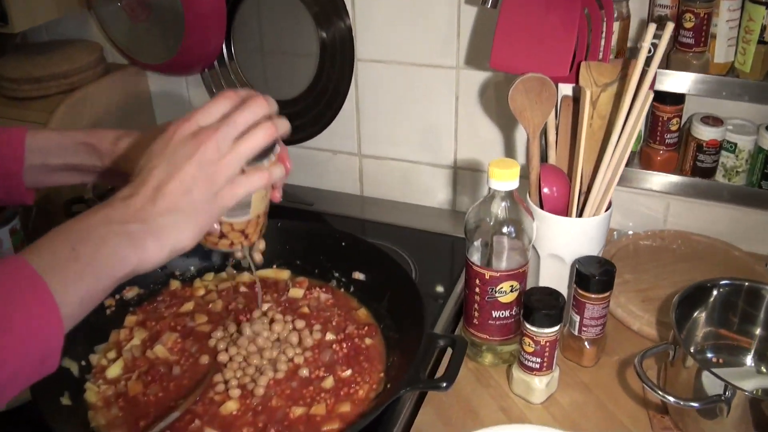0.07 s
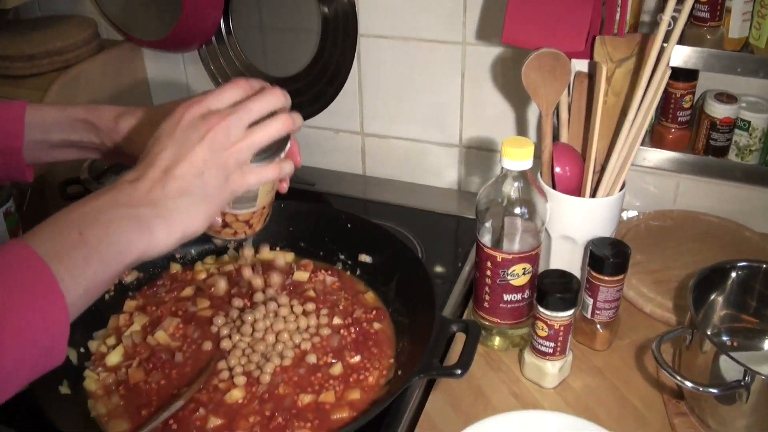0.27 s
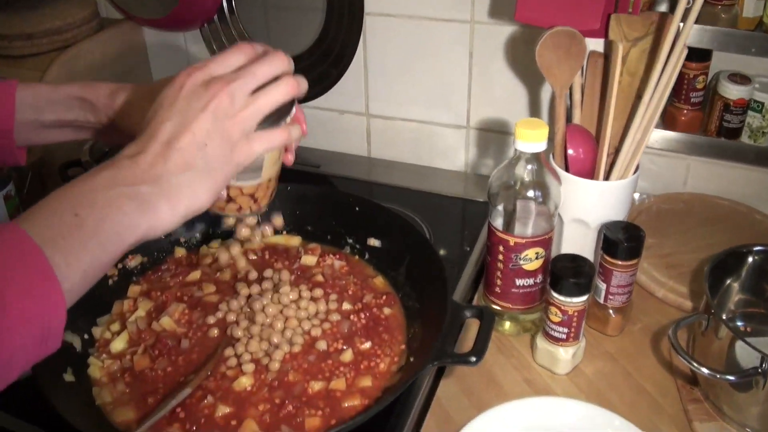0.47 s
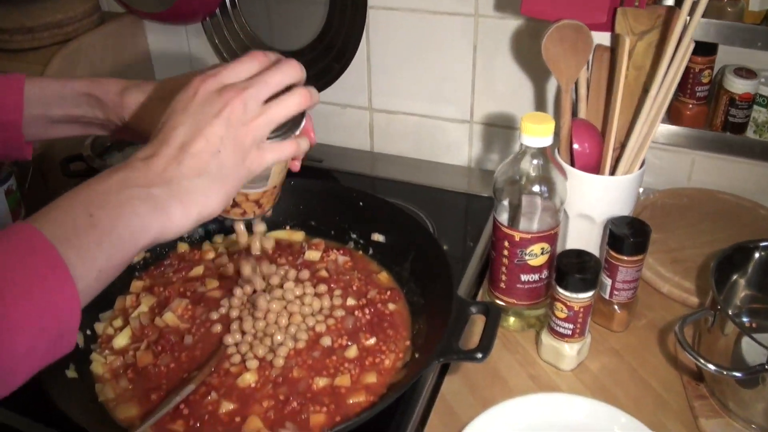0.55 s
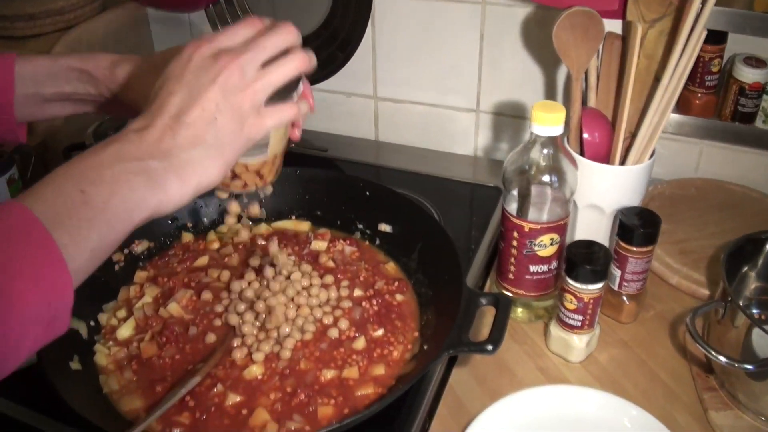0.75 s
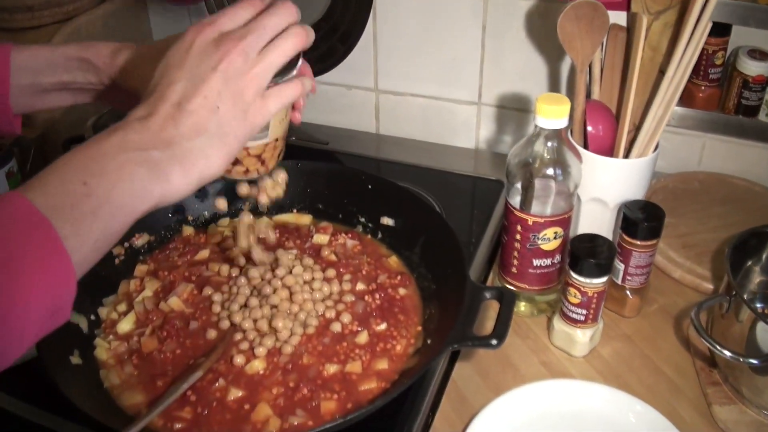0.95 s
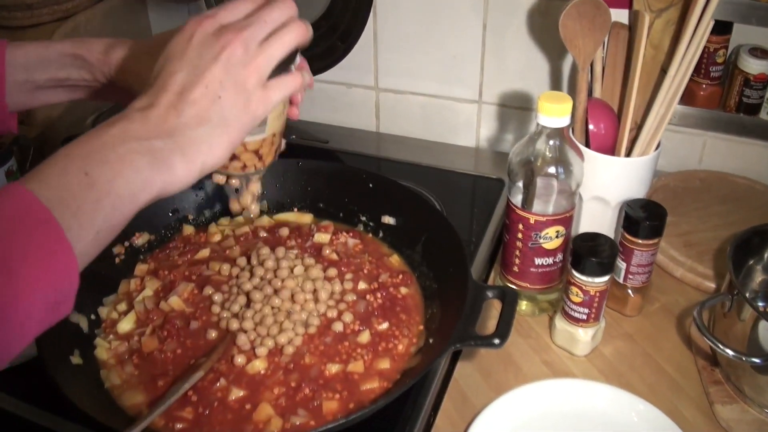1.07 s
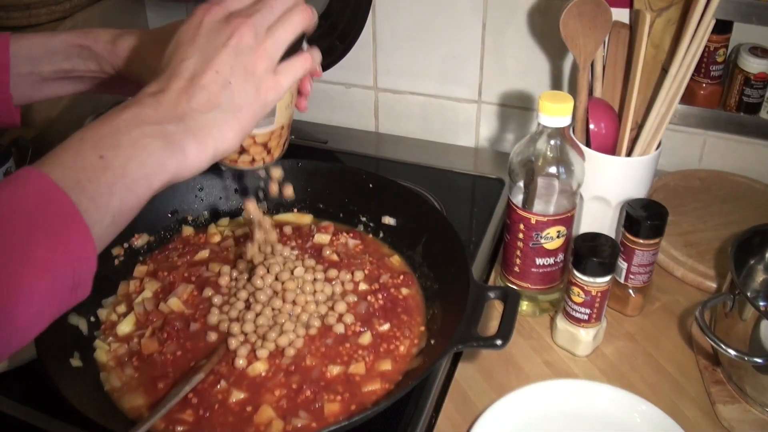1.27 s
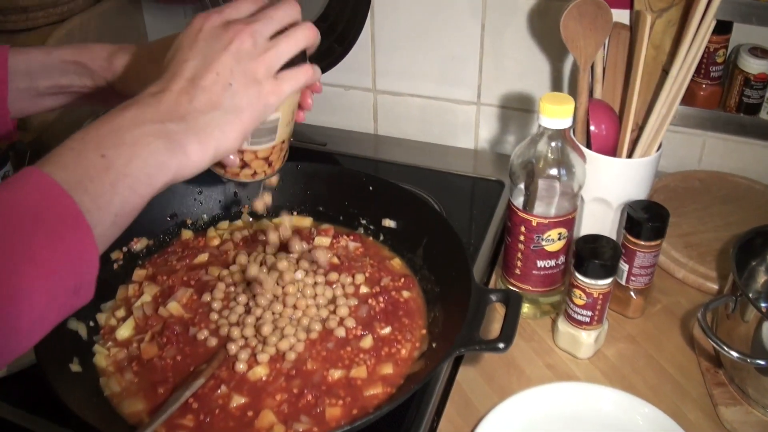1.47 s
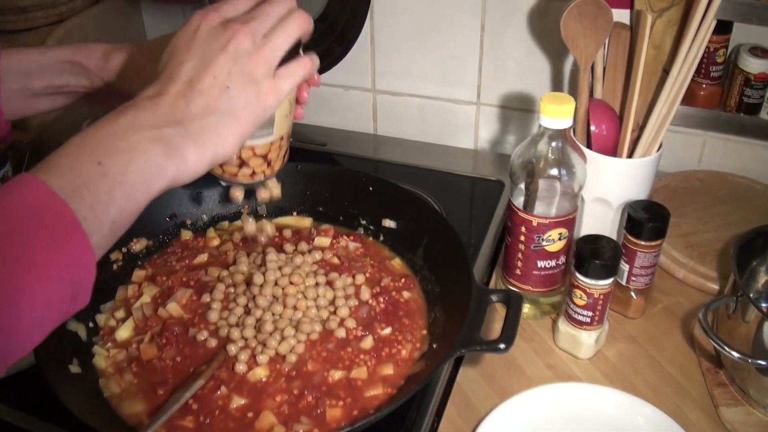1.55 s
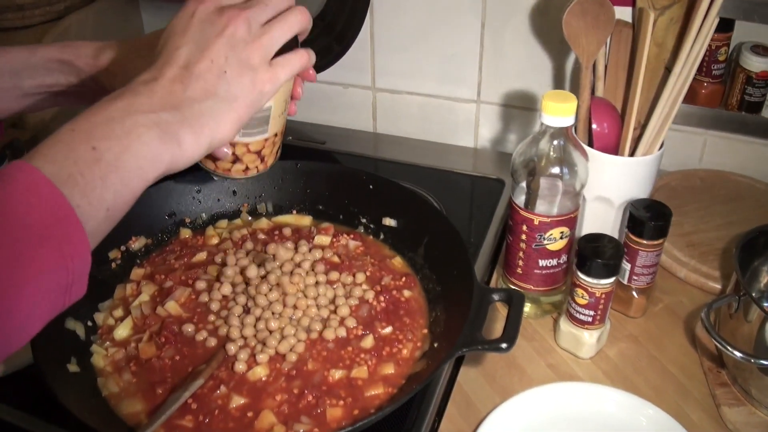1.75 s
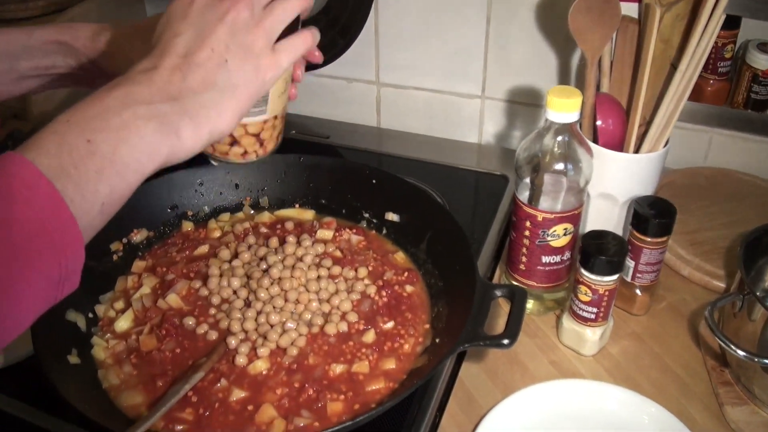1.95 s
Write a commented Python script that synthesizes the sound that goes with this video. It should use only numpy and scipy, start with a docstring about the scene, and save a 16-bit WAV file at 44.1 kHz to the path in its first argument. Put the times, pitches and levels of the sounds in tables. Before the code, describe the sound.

Hollow, rattling thuds of drained chickpeas shaken fast from a tin, in a small kitchen

```python
"""Chickpeas shaken from a tin

Drained chickpeas are shaken out of a tin over a pan in a small kitchen, about seven shakes a second.
Clumps strike the tin: each impulse swells a gliding air resonance and rings the decaying wall modes.
The lows of the hollow note rise as the tin empties. Filtered noise gives the soft hiss of sliding wet peas,
ticks, clicks and splats; a diffuse tail and a faint steady noise form the room."""
import sys
import numpy as np
from scipy import signal
from scipy.fft import rfft, irfft
from scipy.io import wavfile

SR = 44100
rng = np.random.default_rng(int(sys.argv[2]) if len(sys.argv) > 2 else 0)


def digitize_waveform(pressure):
    """Quantize a signal to 16-bit integers and store it at the path in sys.argv[1].

    Rows of a 2-D input are taken as channels; values are limited to [-1, 1].
    """
    field = np.atleast_2d(pressure).T
    bounded = np.clip(field, -1, 1)
    quanta = np.round(bounded * 32767).astype(np.int16)
    wavfile.write(sys.argv[1], SR, quanta)


N = 88200
TIME = np.arange(N) / SR

# Steady room noise, relative spectrum: [f/Hz, level/dB]
ROOM_COLOUR = [(25, 5), (45, -9.5), (70, 0), (120, -7), (200, -9.5), (500, -5.5), (1000, -14.5),
               (2500, -27), (7000, -35), (15000, -34.5)]
ROOM_NOISE_DB = -46.5

# Wet peas slide between the shakes: [middle t/s, Gaussian half length/s, level/dB]
SLIDES = [(.01, 0.026, -50), (0.141, 0.032, -48.5), (0.272, 0.05, -52), (0.434, 0.048, -50.5),
          (0.594, 0.028, -51.5), (0.73, 0.046, -53), (0.896, 0.021, -50.5), (1.327, 0.11, -54),
          (1.623, 0.041, -54), (1.754, 0.025, -52), (1.904, 0.023, -51)]
# Relative spectrum of the sliding hiss: [f/Hz, level/dB]
SLIDE_COLOUR = [(1000, 17.5), (3500, 2), (5500, 7.5), (7500, 10), (9500, 4), (12000, -1), (15000, -34)]

# Sticky ticks as peas part, before the common tick level: [t/s, level/dB]
TICKS = [(0.0244, -55), (0.1137, -25.5), (0.305, -27.5), (0.6594, -28.5), (1.091, -28), (1.2274, -32),
         (1.5567, -29)]
TICK_DB, TICK_LOW_HZ, TICK_T60_S = -12.5, 2980, .013
SPATTER_PER_S, SPATTER_DB = 67, -65.5

# Loose peas roll against the wall between the clumps: [t/s, level/dB]
ROLLING = [(0, -50), (.08, -37), (.45, -47), (.65, -33), (.9, -33), (1.3, -27), (1.77, -27), (1.82, -66)]
ROLLS_PER_S = 270

# Single peas click on the tin, each spot with its own pitch: [t/s, f/Hz, peak level/dB]
PEA_CLICKS = [(0.038, 930, -37.5), (0.107, 1025, -33.5), (0.201, 1630, -30.5), (0.5135, 3560, -35.5),
              (0.518, 1956, -29), (0.662, 1420, -28), (0.834, 4883, -43.5), (1.2575, 4100, -45),
              (1.72, 925, -32.5)]
PEA_CONTACT_S, PEA_T60_S = 0.0017, 0.023
# Thin clinks of the rim: [t/s, f/Hz, peak level/dB]
CLINKS = [(1.0, 3680, -38), (1.0, 5400, -44), (1.432, 3660, -42.5), (1.443, 7590, -39.5)]
CLINK_GRAIN_S, CLINK_T60_S = 0.018, 0.016

# Clumps hit the tin, push before the resonances: [t/s, thud level/dB, wall clatter level/dB]
CLUMPS = [(0.062, -29.5, -56), (0.082, -30, -37.5), (0.201, -20, -28.5), (0.219, -12, -39.5),
          (0.348, -15, -48), (0.362, -15, -28), (0.377, -15.5, -30), (0.507, -18.5, -27),
          (0.514, -12.5, -28), (0.535, -7.5, -23.5), (0.554, -16.5, -27.5), (0.661, -10.5, -20.5),
          (0.677, -8, -26), (0.803, -11, -26.5), (0.818, -12, -21.5), (0.831, -15.5, -28),
          (0.942, -23, -56), (0.963, -17, -36), (0.975, -10, -28), (0.998, -6, -19.5), (1.02, -11.5, -33),
          (1.105, -15.5, -32), (1.116, -9.5, -21), (1.13, -0.5, -23.5), (1.158, -12.5, -31.5),
          (1.273, -5.5, -21), (1.283, -4.5, -25.5), (1.3, -6.5, -28), (1.312, -21, -31), (1.415, -11, -27),
          (1.431, -4, -21), (1.452, -2.5, -22), (1.526, -17.5, -43), (1.562, -22, -37), (1.575, -12, -49),
          (1.592, -9.5, -31.5), (1.603, -12, -36.5), (1.675, -12.5, -47), (1.694, -14, -44),
          (1.709, -16.5, -36.5), (1.718, -46, -26), (1.773, -30.5, -46)]
# Single peas follow a clump and die away with time constant STRAGGLE_S
STRAGGLERS_PER_S, STRAGGLE_S = 900, 0.013
THUD_STRAGGLER_DB, WALL_STRAGGLER_DB = -14.5, -5

# Air note of the tin at each shake: [t/s, f/Hz at the start, f/Hz at the bottom]
SHAKES = [(.19, 542.3, 336.4), (0.344, 445.7, 367.2), (0.507, 496.8, 369.7), (.655, 472.4, 339.5),
          (0.797, 492.6, 343.2), (0.967, 523.5, 415.8), (1.11, 539.8, 420), (1.264, 478.2, 508),
          (1.414, 473.4, 479), (1.561, 550, 506), (1.68, 519, 505.6)]
SAG_S, SAG_HOLD_S = 0.056, .105  # from the shake's start: the bottom is reached, then left
# Half width of the air note, purer in the empty tin: [t/s, half width/Hz]
AIR_WIDTH_HZ = [(0, 88.8), (1.4, 67.1), (1.65, 40.2)]
AIR_LEAD_S = 0.003873  # the swell starts just before the crack
AIR_T60_S, AIR_DB = 0.15, -5
AIR_RING_DB, AIR_RING_RATIO = -19, 0.94  # the note rings on, a little below the swell
SOFT_HZ, LOW_CUT_HZ = 850, 341

# Low modes of the tin: [f/Hz, full tin level/dB, empty tin level/dB, empty tin t60/s]
LOW_MODES = [(381.6, -21.5, -50, 0.25), (428, -22, -24, 0.28), (531, -21, -16, 0.3), (604, -15, -21, 0.25),
             (675, -48, -26, 0.18)]
EMPTYING_S = 0.94
FULL_RING_SHARE = .45  # peas damp the full tin, so it rings this share as long

# Modes of the tin wall: [f/Hz before detuning, level/dB, undamped t60/s]
WALL_MODES = [(794, -12.5, 0.23), (934, -5, 0.078), (958.7, -6.5, 0.16), (1058, -25, 0.24),
              (1240, -11.5, 0.093), (1300, -11, 0.057), (1451, -17, 0.16), (1415, -17.5, 0.26),
              (1755, -16, 0.032), (1890, -21, 0.19), (2040, -39.5, 0.33)]
# Peas damp the wall until the last ones leave: [t/s, share of t60]
WALL_RING_SHARE = [(0, 0.28), (1.2, 0.62), (1.7, 0.95)]
WALL_DB = -4
GRIP_DETUNE = 0.0084  # relative spread; the grip shifts the modes from blow to blow, more in the full tin
# Relative spectrum of the dull contact crack: [f/Hz, level/dB]
CRACK = [(100, -14.5), (180, 12), (270, 5), (500, -15.5), (950, -2), (1150, 0), (1450, -18), (2000, 2),
         (2500, -21.5), (3400, -6.5), (4300, -41.5), (7500, -36), (15000, -38)]
CRACK_DB, CRACK_RISE_S, CRACK_SMEAR_S = 14, 0.0063, 0.0056

SWELL_S = .025  # time a swell takes to reach its top
GULP_DB = -22
# The base of the tin rings where the load lands on it: [t/s, f/Hz, level/dB]
BASE_RINGS = [(0.212, 603, -21), (0.355, 603, -23), (0.53, 600, -21), (0.665, 520, -23), (0.803, 598, -20),
              (0.997, 607, -18), (1.278, 600, -18), (1.435, 520, -14), (1.556, 665, -23)]

# Wet splats on the harder shakes: [t/s, level/dB]
SPLATS = [(0.517, -47.5), (0.662, -51), (.81, -53), (0.832, -65), (0.975, -50), (0.999, -53), (1.105, -49),
          (1.129, -54), (1.27, -50.5), (1.428, -45.5), (1.446, -56)]
SPLAT_S, SPLAT_LOW_HZ, SPLAT_HIGH_HZ = 0.029, 2560, 7000

KITCHEN_T60_S, WALL_DELAY_S = 0.32, 0.0011
THUD_WET_DB, CLATTER_WET_DB = -10.5, -5
CUTOFF_HZ = 15600


def from_db(db):
    """Amplitude ratio: 20 dB is a factor of ten."""
    return 10 ** (np.asarray(db) / 20)


def rms_one(x):
    """Normalisation to unit root mean square."""
    return x / np.sqrt(np.mean(x ** 2) + 1e-20)


def cut(x, hz, kind, order=2):
    """Butterworth high- or low-pass: a maximally flat passband."""
    return signal.sosfilt(signal.butter(order, min(hz, .45 * SR), kind, fs=SR, output="sos"), x + 1e-18)


def colour(x, points):
    """Minimum-phase filtering: a folded cepstrum gives the causal response through (f/Hz, level/dB) points."""
    size = 2 * N
    hz, db = np.transpose(points)
    log_f = np.log(np.fft.rfftfreq(size, 1 / SR) + 1)
    cepstrum = irfft(np.log(from_db(np.interp(log_f, np.log(hz), db))))
    cepstrum[1:N] *= 2
    cepstrum[N + 1:] = 0
    return irfft(rfft(x, size) * np.exp(rfft(cepstrum)))[:N]


def ring(clicks, hz, t60):
    """Damped oscillator: a unit click excites a decaying sine of initial height 1."""
    r = np.exp(-np.log(1000) / (t60 * SR))
    w = 2 * np.pi * hz / SR
    return signal.lfilter([0, np.sin(w)], [1, -2 * r * np.cos(w), r * r], clicks + 1e-18)


def add(out, s, x):
    """Superposition: mix x into out from time s on."""
    start = max(int(s * SR), 0)
    out[start:start + len(x)] += x[:max(N - start, 0)]


def impacts(per_s, count):
    """Random impulse train: independent arrivals with normally distributed heights."""
    return (rng.random(count) < per_s / SR) * rng.standard_normal(count)


def room_noise():
    """Steady noise: a random signal shaped by the room spectrum."""
    return from_db(ROOM_NOISE_DB) * rms_one(colour(rng.standard_normal(N), ROOM_COLOUR))


def sliding():
    """Friction noise: coloured hiss under Gaussian swells of level."""
    level = sum(from_db(db) * np.exp(-.5 * ((TIME - s) / half) ** 2) for s, half, db in SLIDES)
    return level * rms_one(colour(rng.standard_normal(N), SLIDE_COLOUR))


def ticks():
    """Adhesive release: parting wet skins snap as decaying noise, a few clearly and many as fine spatter."""
    clicks = np.zeros(N)
    for s, db in TICKS:
        add(clicks, s, from_db([db + TICK_DB]))
    t = TIME[:N // 40]
    snap = rng.standard_normal(len(t)) * np.exp(-np.log(1000) * t / TICK_T60_S)
    spatter = impacts(SPATTER_PER_S, N)
    clear, fine = (cut(signal.fftconvolve(c, snap)[:N], TICK_LOW_HZ, "high", order=1)
                   for c in (clicks, spatter))
    return clear + from_db(SPATTER_DB) * rms_one(fine)


def rolling():
    """Random excitation: rolling peas press on the wall in impulses of varying level."""
    return impacts(ROLLS_PER_S, N) * from_db(np.interp(TIME, *np.transpose(ROLLING)))


def rubbed(rows, contact_s, t60):
    """Contact excitation: grainy, exponentially dying noise rings one resonance per row."""
    out, t = np.zeros(N), TIME[:N // 4]
    for s, hz, db in rows:
        contact = np.exp(-t / contact_s) * rng.standard_normal(len(t))
        tone = ring(contact, hz, t60)
        add(out, s, from_db(db) * tone / np.abs(tone).max())
    return out


def clinks():
    """Local resonance: single peas click on the tin, and now and then one grazes the rim with a thin ting."""
    return rubbed(PEA_CLICKS, PEA_CONTACT_S, PEA_T60_S) + rubbed(CLINKS, CLINK_GRAIN_S, CLINK_T60_S)


def clump(straggler_db):
    """Collision of a granular mass: one unit blow, then a dying shower of single peas."""
    t = TIME[:N // 4]
    clicks = impacts(STRAGGLERS_PER_S, len(t)) * from_db(straggler_db) * np.exp(-t / STRAGGLE_S)
    clicks[0] = 1
    return clicks


def gliding(push, hz, lowpass):
    """Heterodyning: shift down, smooth, shift back up, so that the resonance follows hz."""
    turn = np.exp(2j * np.pi * np.cumsum(hz) / SR)
    return np.imag(turn * signal.sosfilt(lowpass, push / turn))


def air_note():
    """Cavity resonance: f/Hz moves to each shake's bottom, mostly a sag, holds, then moves to the next start."""
    points = []
    for s, start, bottom in SHAKES:
        points += [(s, start), (s + SAG_S, bottom), (s + SAG_HOLD_S, bottom)]
    return np.interp(TIME, *np.transpose(points))


def low_rings(blows):
    """Modal damping: low modes pass from short rings in the full tin to long ones in the empty tin."""
    emptied = np.minimum(TIME / EMPTYING_S, 1)
    out = np.zeros(N)
    for hz, full_db, empty_db, t60 in LOW_MODES:
        push = blows * from_db(full_db + emptied * (empty_db - full_db))
        out += ring(push * (1 - emptied), hz, t60 * FULL_RING_SHARE)
        out += ring(push * emptied, hz, t60)
    return out


def thuds():
    """Forced resonance: soft blows swell the air note; with the rolling peas they sustain the low rings."""
    note = air_note()
    blows, air = np.zeros((2, N))
    for s, db, _ in CLUMPS:
        push = from_db(db) * clump(THUD_STRAGGLER_DB)
        width = np.interp(s, *np.transpose(AIR_WIDTH_HZ))
        hz = np.interp(s + TIME[:len(push)], TIME, note)
        swelling = gliding(push, hz, signal.butter(3, width, fs=SR, output="sos"))
        add(air, s - AIR_LEAD_S, swelling * SR / (2 * width))  # offsets the loss in a narrow band
        add(blows, s, push)
    blows += rolling() + 1e-18
    decay = signal.tf2sos([1], [1, -np.exp(-np.log(1000) / (AIR_T60_S * SR))])
    air += from_db(AIR_RING_DB) * gliding(blows, note * AIR_RING_RATIO, decay)
    soft = cut(from_db(AIR_DB) * air + low_rings(blows), SOFT_HZ, "low")
    return cut(soft, LOW_CUT_HZ, "high", order=8)


def struck(push, s):
    """Modal superposition: a blow at time s rings every wall mode, longer as the tin empties."""
    share = np.interp(s, *np.transpose(WALL_RING_SHARE))
    out = 0
    for hz, db, t60 in WALL_MODES:
        detuned = hz * (1 + rng.normal(0, GRIP_DETUNE / share))
        out = out + from_db(db) * ring(push, detuned, t60 * share)
    return out


def clatter():
    """Impact noise: each clump crunches with its own grain, heard as a crack and through the wall modes."""
    cracks, wall = np.zeros((2, N))
    t = TIME[:N // 32]
    shape = np.exp(-t / CRACK_SMEAR_S) * (1 - np.exp(-t / CRACK_RISE_S))
    for s, _, db in CLUMPS:
        grain = rng.standard_normal(len(t)) * shape / np.linalg.norm(shape)
        crunch = from_db(db) * signal.fftconvolve(clump(WALL_STRAGGLER_DB), grain)
        add(cracks, s, crunch)
        add(wall, s, struck(crunch, s))
    ringing = from_db(WALL_DB) * cut(wall, LOW_CUT_HZ, "high", order=8)
    return ringing + from_db(CRACK_DB) * colour(cracks, CRACK)


def swell(s):
    """Transient envelope: level rises from time s to 1 and dies soon after."""
    age = np.maximum(TIME - s, 0) / SWELL_S
    return age * np.exp(.5 * (1 - age ** 2))


def gulps():
    """Cavity tone: air drawn in behind the sliding load gives a clear gulp that bends with the air note."""
    cycles = np.cumsum(air_note() * AIR_RING_RATIO) / SR
    tone = np.sin(2 * np.pi * (cycles + rng.random()))
    return from_db(GULP_DB) * tone * sum(swell(s + .5 * SWELL_S) for s, _, _ in SHAKES)


def base_rings():
    """Plate resonance: the base swells with the load and is damped by the hand before the next shake."""
    return sum(from_db(db) * swell(s) * np.sin(2 * np.pi * (hz * TIME + rng.random()))
               for s, hz, db in BASE_RINGS)


def splats():
    """Jet noise: liquid squeezed from between the peas bursts in short, grainy, band-limited noise."""
    level = np.zeros(N)
    for s, db in SPLATS:
        add(level, s, from_db(db) * np.exp(-TIME[:N // 8] / SPLAT_S))
    grains = rng.standard_normal(N) * rng.standard_normal(N)  # the product is spikier than plain noise
    band = cut(cut(grains, SPLAT_LOW_HZ, "high"), SPLAT_HIGH_HZ, "low", order=1)
    return level * rms_one(band)


def kitchen(x):
    """Reverberation: convolution with exponentially decaying noise, a diffuse tail from the tiles."""
    t = TIME[:N // 3]
    tail = rng.standard_normal(len(t)) * np.exp(-np.log(1000) * t / KITCHEN_T60_S)
    tail *= t > WALL_DELAY_S
    return signal.fftconvolve(x, tail / np.linalg.norm(tail))[:N]


def scene():
    """Superposition of tin, peas and room at one microphone."""
    low = thuds() + gulps() + base_rings()
    high = clatter() + ticks() + clinks() + splats()
    reverberation = kitchen(from_db(THUD_WET_DB) * low + from_db(CLATTER_WET_DB) * high)
    return (low + high + sliding() + reverberation + room_noise())[None]


def record(dry):
    """Band limitation: an elliptic low-pass cuts the top steeply."""
    return signal.sosfilt(signal.ellip(12, .1, 80, CUTOFF_HZ, fs=SR, output="sos"), dry)


dry = scene()
out = record(dry)
digitize_waveform(out)
```